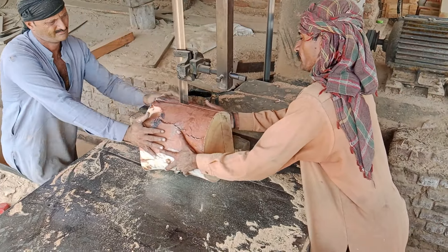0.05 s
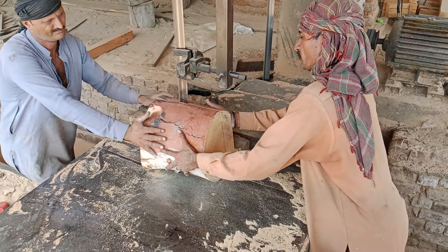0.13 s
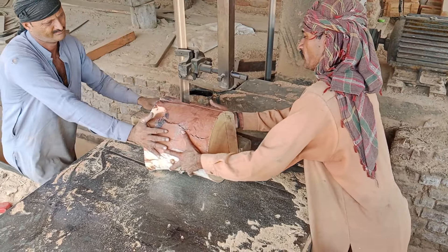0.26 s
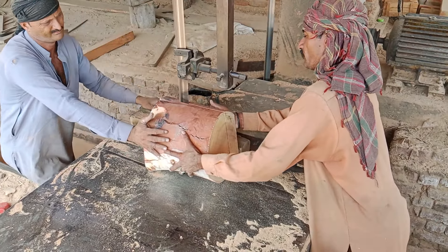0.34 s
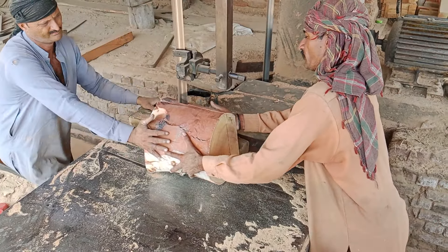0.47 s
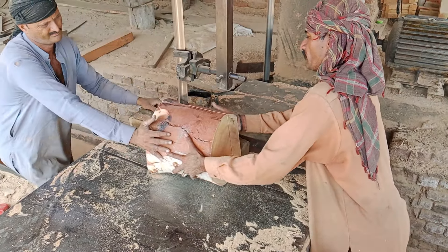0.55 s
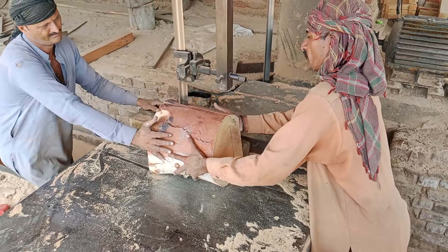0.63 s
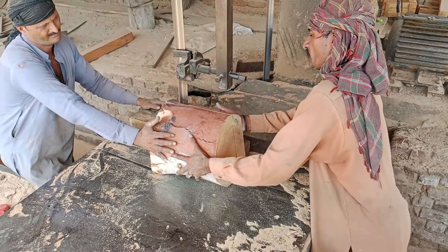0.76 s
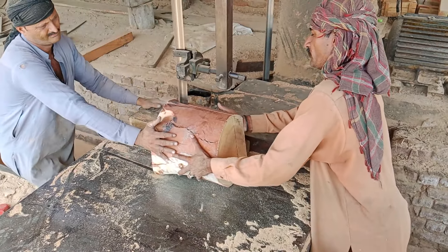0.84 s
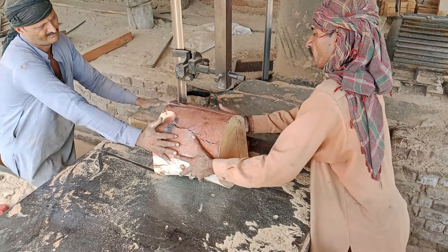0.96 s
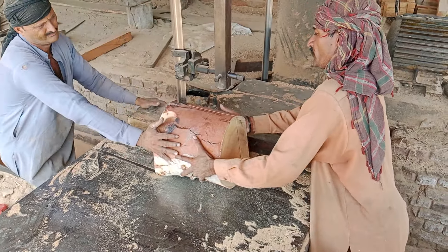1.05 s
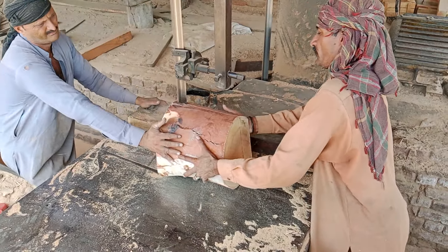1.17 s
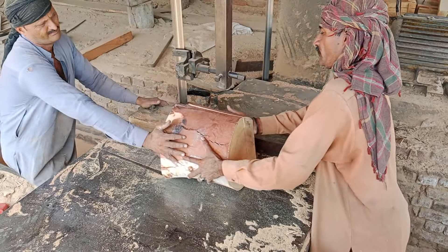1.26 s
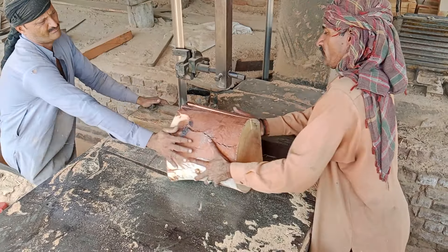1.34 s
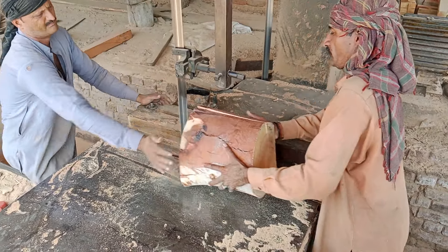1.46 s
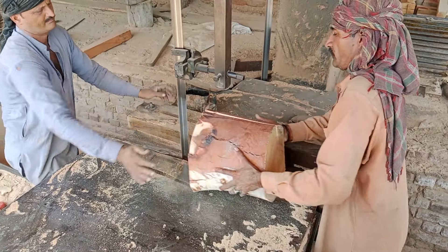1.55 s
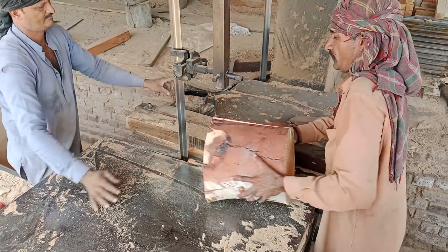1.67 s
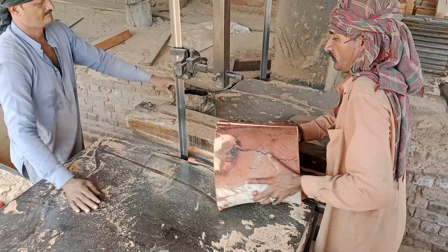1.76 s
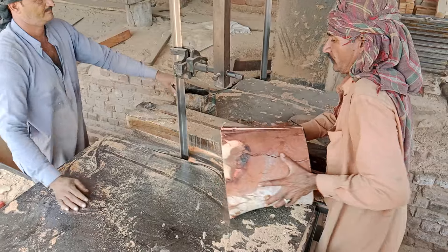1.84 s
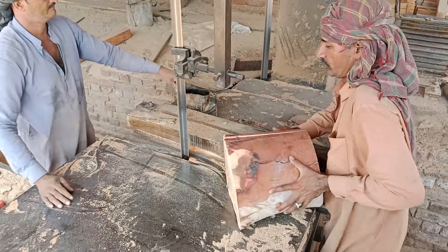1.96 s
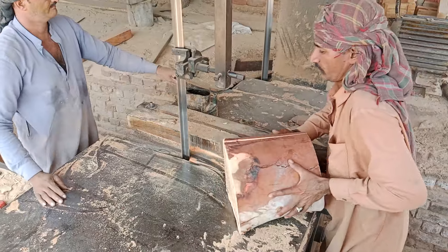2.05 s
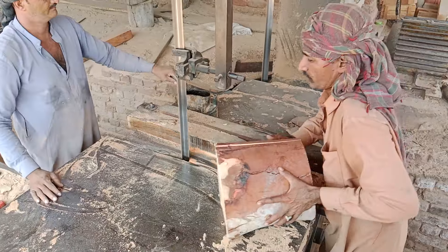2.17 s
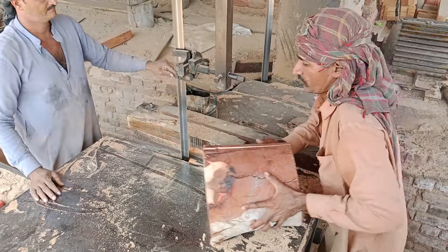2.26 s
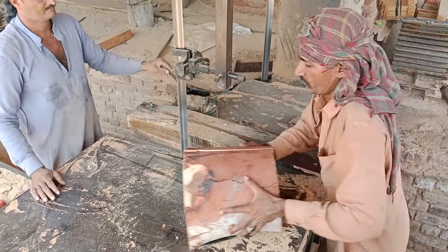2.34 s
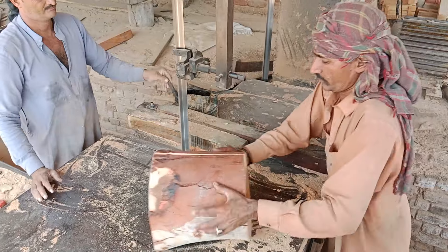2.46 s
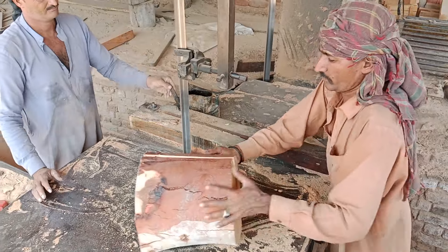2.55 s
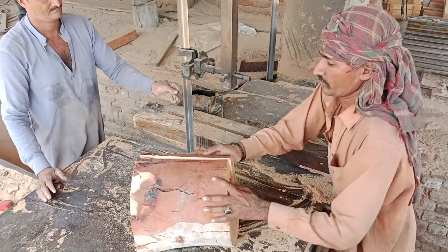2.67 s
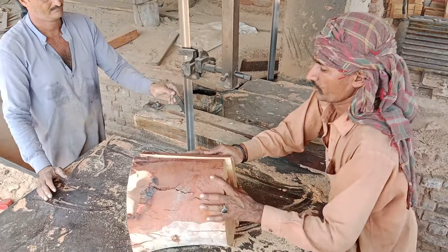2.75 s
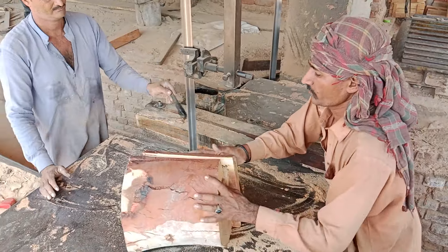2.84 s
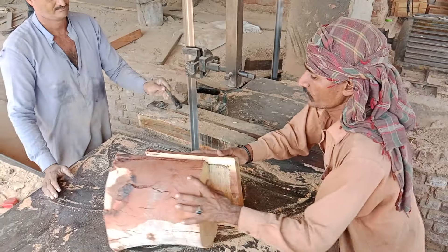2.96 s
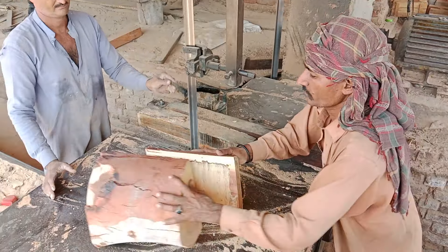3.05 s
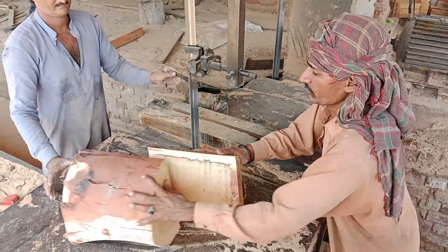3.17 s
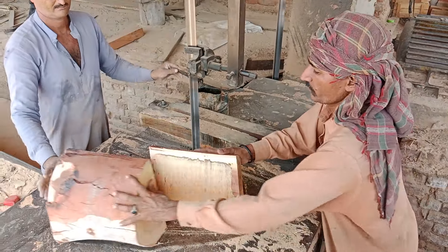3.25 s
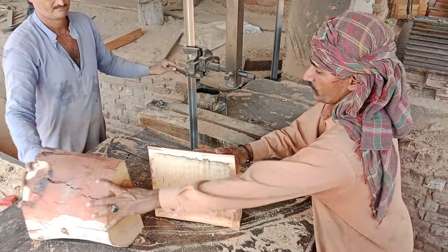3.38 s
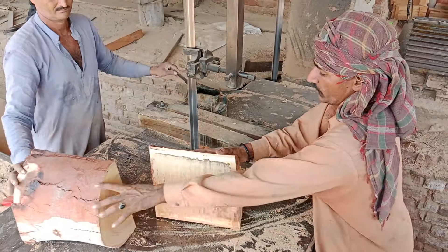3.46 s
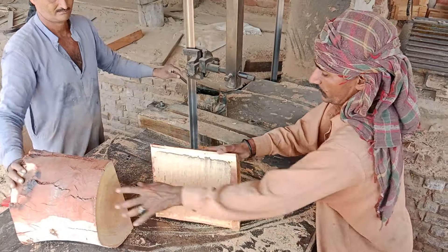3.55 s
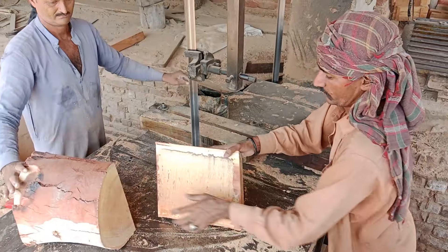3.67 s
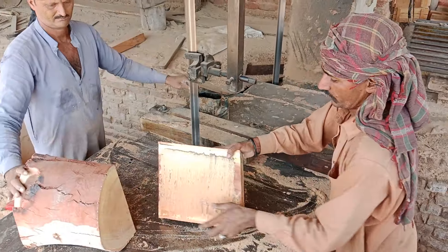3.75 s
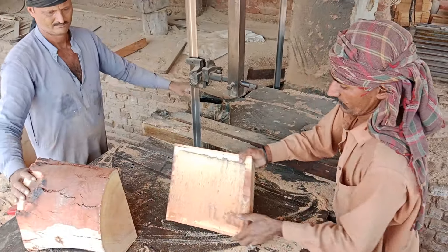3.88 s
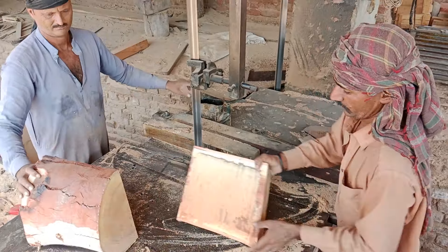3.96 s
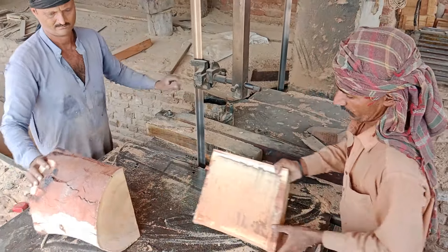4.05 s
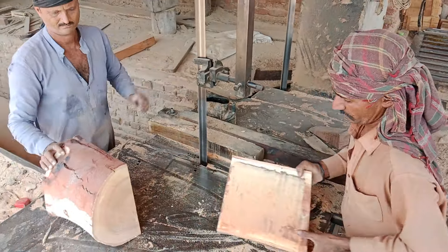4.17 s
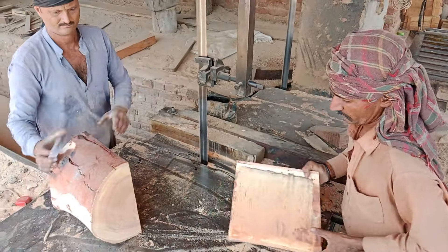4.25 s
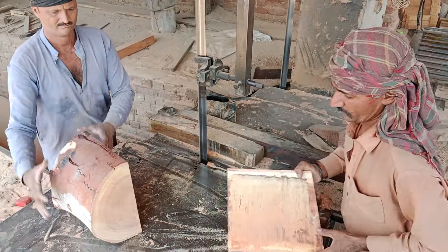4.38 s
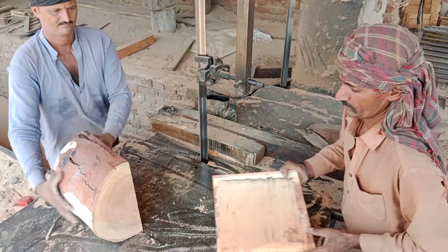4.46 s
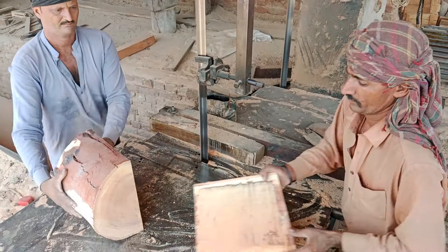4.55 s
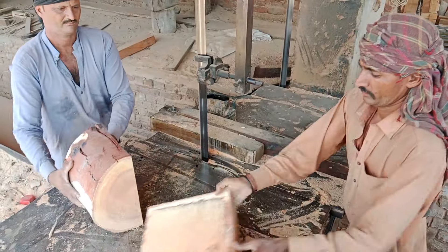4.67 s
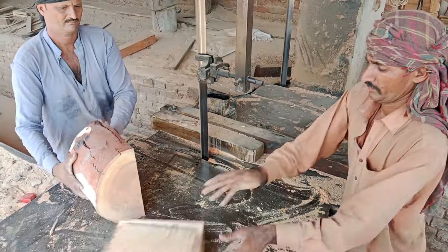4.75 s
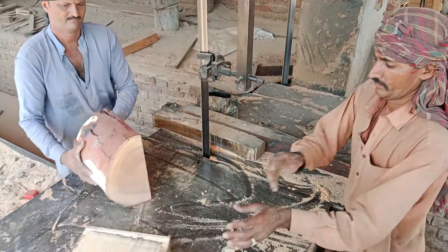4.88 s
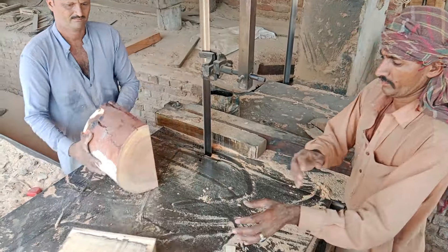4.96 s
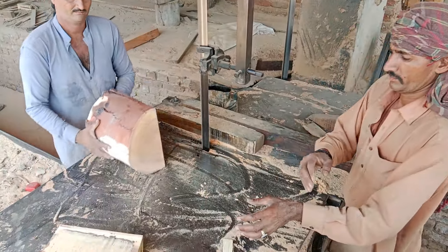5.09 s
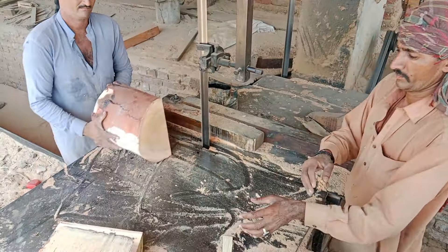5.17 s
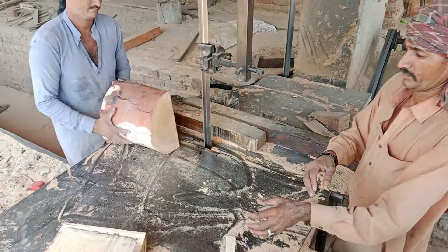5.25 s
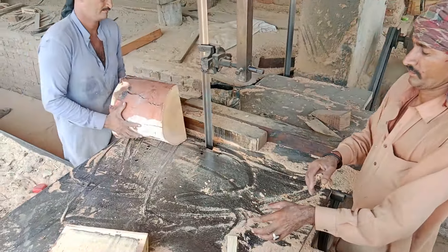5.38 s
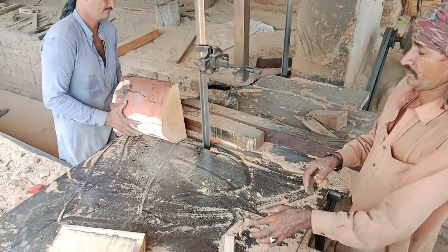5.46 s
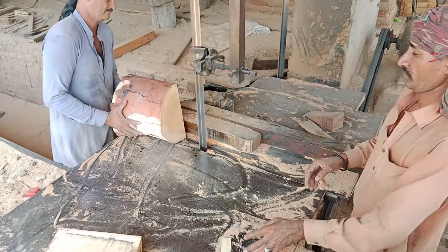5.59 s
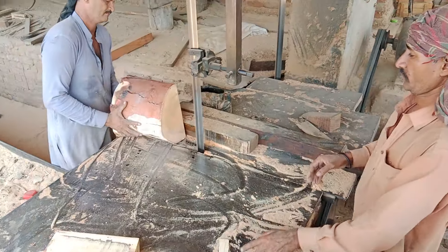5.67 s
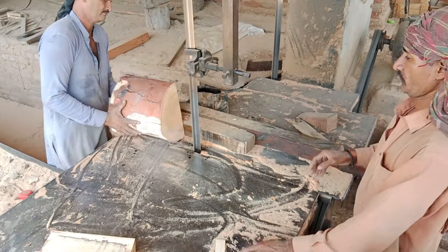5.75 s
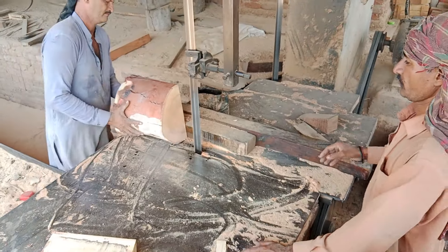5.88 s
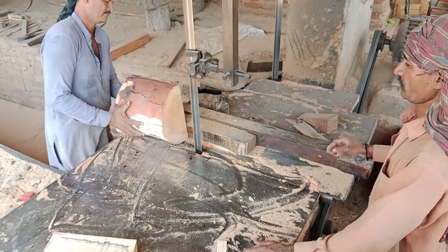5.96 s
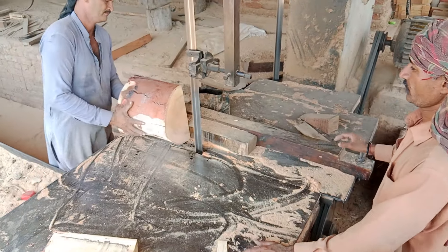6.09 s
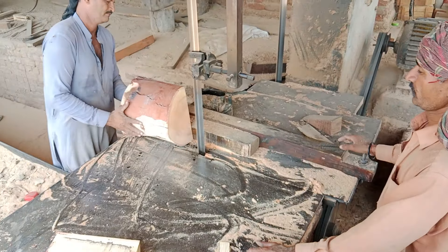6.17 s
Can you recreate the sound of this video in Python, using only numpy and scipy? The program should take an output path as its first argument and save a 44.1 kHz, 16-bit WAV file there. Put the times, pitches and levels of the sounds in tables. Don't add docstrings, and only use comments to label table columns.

```python
import sys
import numpy as np
from scipy import signal
from scipy.fft import rfft, irfft, next_fast_len
from scipy.io import wavfile
from scipy.ndimage import uniform_filter1d

SR = 44100
rng = np.random.default_rng(int(sys.argv[2]) if len(sys.argv) > 2 else 0)


def gain_from_db(level_db):
    decades = np.asarray(level_db, float) / 20
    return 10 ** decades


def store_wav(level_fs):
    pcm = np.round(np.clip(np.atleast_2d(level_fs), -1, 1) * 32767)
    wavfile.write(sys.argv[1], SR, pcm.T.astype(np.int16))


N = 274302
SECONDS = np.arange(N) / SR
CUT_ENDS_S = 1.318
WHEEL_HZ = 9.33


def unit(x):
    return x / np.sqrt(np.mean(x ** 2))


def curves(table):
    s, *columns = np.transpose(table)
    return [np.interp(SECONDS, s, c) for c in columns]


def ramp(start_s, end_s, db):
    return db * np.clip((SECONDS - start_s) / (end_s - start_s), 0, 1)


def swell(middle_s, length_s, height):
    return height * np.exp(-(2 * (SECONDS - middle_s) / length_s) ** 2)


def swells(table):
    return sum(swell(*row) for row in table)


def walk(rate_hz):
    k = int(SR / rate_hz)
    held = np.repeat(rng.standard_normal(N // k + 1), k)[:N]
    return unit(uniform_filter1d(uniform_filter1d(held, k), k))


def noise(quick_db, rate_hz):
    return rng.standard_normal(N) * gain_from_db(2 * quick_db * np.tanh(walk(rate_hz) / 2))


def colour(x, points, modes=(), order=1):
    size = next_fast_len(N)
    hz = np.arange(1, size // 2 + 2) * SR / size
    at, db = np.transpose(points)
    broad = gain_from_db(np.interp(np.log(hz), np.log(at), db, left=-120, right=-120))
    rings = sum(gain_from_db(d) * np.exp(1j * lean) / (1 + 2j * (hz - f) / w) ** order for f, w, d, lean in modes)
    return irfft(rfft(x, size) * broad * (1 + rings), size)[:N]


def narrow(hz, width_hz, steady=0.37):
    peak = signal.iirpeak(hz, hz / width_hz / 1.5, SR)
    ringing = signal.lfilter(*peak, signal.lfilter(*peak, noise(0.61, 12)))
    power = uniform_filter1d(ringing ** 2, SR // 16) + 1e-12
    return unit(ringing / power ** (steady / 2))


# time in seconds, tooth rate in Hz, bite level in dB.
CUT = [
    (0, 583.5, -25.5),
    (.2, 584, -22),
    (.4, 577.7, -19.5),
    (.6, 570, -21.5),
    (.8, 563.3, -20),
    (1.0, 555.7, -16),
    (1.2, 546.5, -27),
    (1.315, 546.4, -20),
    (1.34, 547, -63),
]
# Hz, width
# in Hz, dB, lean in rad.
CUT_MODES = [(548, 11, 14, 0), (636, 9.9, 15, 0), (760, 13, 7, 0), (999, 14, 14, 0), (1764, 21, 21, 0),
             (1100, 12, 8, 0), (2262, 48, 27.5, 0), (2748, 45, 30, 0), (3440, 57, 3, 0), (3960, 40, 16, 0),
             (4567, 120, 14, 0), (4670, 75, 16.5, 0), (5080, 35, 18, 0), (5770, 54, 2, 0),
             (6250, 170, 11, 0), (6970, 460, 8.5, 0), (7110, 105, 25.5, 0), (13700, 700, 13, 0),
             (14100, 80, -1, 0), (14950, 120, 4, 0), (15370, 80, 12, 0)]
# Hz, dB.
BITE_COLOUR = [(300, -43), (500, -10), (1150, -6.5), (1500, -3), (3000, -35), (6500, 9.5), (7400, -0.5),
               (8500, -9), (10500, -29), (12000, -34), (12800, -7), (15000, -10), (16000, -36)]


def teeth():
    set_db, scatter_db, slip_teeth, wander = 7, 1.5, .006, .0007
    chips_db, chip_decay_teeth = -7, 0.32
    tooth_hz, bite_db = curves(CUT)
    turns = np.cumsum(2 * tooth_hz * (1 + wander * walk(25))) / SR
    count = np.arange(1, int(turns[-1]))
    slips, scatter = rng.standard_normal((2, len(count)))
    when = np.clip(np.interp(count + slip_teeth * slips, turns, np.arange(N)), 8, N - 9)
    size = gain_from_db(set_db * (count % 2) + scatter_db * scatter)

    at = when.astype(int) + np.arange(-7, 9)[:, None]
    bites = np.zeros(N)
    np.add.at(bites, at, size * np.sinc(at - when) * np.cos((at - when) * np.pi / 16) ** 2)

    chips = noise(0.7, 27.5) * np.exp(-(turns % 1) / chip_decay_teeth)
    bites = unit(colour(bites, BITE_COLOUR, CUT_MODES, order=2))
    chips = unit(colour(chips, BITE_COLOUR, CUT_MODES))
    return gain_from_db(bite_db) * (bites + gain_from_db(chips_db) * chips)


def squeal():
    from_db, grows_db_per_s = -56, 9.5
    db = from_db + grows_db_per_s * np.minimum(SECONDS, CUT_ENDS_S)
    db = db + swell(1.24, 0.39, 10.5) + ramp(1.33, 1.47, -30)
    return gain_from_db(db) * narrow(2750, width_hz=22)


def tooth_phase():
    return 2 * np.pi * np.cumsum(curves(CUT)[0]) / SR


def parting_log():
    level = swell(1.125, .12, gain_from_db(-35))
    return np.sqrt(2) * level * np.sin(2 * tooth_phase() + .4 * walk(30.3))


# multiple of the roller rate, dB rms, beat in dB once a wheel turn.
ROLLER_PARTIALS = [(5, -45, 2), (6, -42, 2), (7, -43, 5), (9, -47, 3), (10, -48, 3)]


def roller():
    turns_per_tooth, beat_peak_s = .192, .26
    phase = turns_per_tooth * tooth_phase()
    beat = np.cos(2 * np.pi * WHEEL_HZ * (SECONDS - beat_peak_s))
    stack = 0
    for multiple, db, beat_db in ROLLER_PARTIALS:
        level = gain_from_db(db + beat_db * beat + 2.7 * walk(6.36))
        stack = stack + level * np.sin(multiple * phase + 1.14 * walk(12))
    return np.sqrt(2) * stack * gain_from_db(ramp(CUT_ENDS_S, CUT_ENDS_S + .2, -41))


def settle(db, settle_s):
    drops_s = 0.018
    since_s = np.maximum(SECONDS - CUT_ENDS_S, 0)
    return db * (1 - np.exp(-since_s / drops_s)) * np.exp(-since_s / settle_s)


# Hz, dB.
RUB_COLOUR = [(1000, -27), (1250, -15.5), (1450, -14), (1750, -8.5), (2250, -9), (3100, -14), (4000, -9.5),
              (5200, -2), (6200, 0.5), (7200, 0), (7800, -10.5), (9000, -21.5), (10500, -30.5),
              (12000, -27.5)]
# Hz, width in Hz, dB, lean in rad.
BLADE_MODES = [(2652, 83, 11, 1.62), (3410, 28, 2.5, 0), (4060, 45, -5, 0), (5430, 29, -17, 0.12),
               (6808, 95, 7, 0.38)]


def blade_rub(flutter, cutting, path_db):
    edges_hz = (900, 2000, 3400, 4800, 6400, 7800, 12500)
    treble_db = ramp(4.6, 7, 6.2) + swell(3.72, .25, -3)
    dip_db = settle(-12.5, 0.075)
    rub = 0
    for low, high in zip(edges_hz[:-1], edges_hz[1:]):
        band = signal.butter(2, (low, high), "bandpass", fs=SR, output="sos")
        part = signal.sosfilt(band, noise(0.79, 18)) * flutter ** (low / 13500)
        db = treble_db * (high == edges_hz[-1]) + dip_db * min(low / 5700, 1)
        rub = rub + part * gain_from_db(db)
    return gain_from_db(-21 + 1.2 * cutting + path_db) * unit(colour(rub, RUB_COLOUR, BLADE_MODES))


# Hz, dB.
HISS_COLOUR = [(8500, -20), (10000, -25), (12050, -17.5), (12500, -5), (13600, 3), (14300, 1.5),
               (15000, -1), (15800, -5)]


def guide_hiss(flutter, cutting, path_db):
    db = -36 + 9 * cutting + 0.64 * path_db + settle(-8, 0.24) + ramp(3.1, 3.3, -2.1)
    return gain_from_db(db) * unit(colour(noise(0.99, 16) * flutter, HISS_COLOUR))


# middle in seconds, length in seconds, height in dB.
SONG_SWELLS = [(1.77, 0.047, 7), (2.463, 0.064, 4.5), (3.196, .2, 3), (3.58, .2, 1.5), (3.38, .08, 0),
               (3.706, 0.045, -2), (4.2, 1, -1), (5.403, 0.45, 5), (5.56, .06, -5)]


def blade_song(cutting, path_db):
    lap_hz, lap_peak_s, lap_db = 2.88, 2.168, 1
    lap = np.cos(2 * np.pi * lap_hz * (SECONDS - lap_peak_s))
    db = -36 - 3.5 * cutting + 0.53 * path_db + lap_db * lap + swells(SONG_SWELLS)
    return gain_from_db(db) * narrow(2559, width_hz=40)


# Hz, dB.
DRONE_COLOUR = [(330, -9.5), (420, -7), (500, -0.5), (700, 3), (1050, 3.5), (1200, -5.5), (1500, -22)]
# Hz, width in Hz, dB, lean in rad.
PANEL_MODES = [(533, 18, 0.84, 0), (638, 18, 1.5, 0), (752, 23, 1.3, 0), (857, 24, 3.3, 0),
               (895, 9.8, 8.6, 0), (1069.4, 12, 2.4, 0)]
# middle in seconds, length in seconds, height in dB.
DRONE_SWELLS = [(3.3, .6, 0.63)]


def frame_drone(cutting, path_db):
    db = -35.5 + 1.5 * cutting + 0.1 * path_db + ramp(4.6, 6.6, -2) + swells(DRONE_SWELLS)
    return gain_from_db(db) * unit(colour(noise(.5, 14), DRONE_COLOUR, PANEL_MODES))


# middle in seconds, length in seconds, height in dB.
HUM_SWELLS = [(1.2, 0.27, 2.5), (2.3, 0.27, 2.8), (3.3, 0.92, 12), (5.7, 0.55, 3)]


def hum(cutting):
    return gain_from_db(-53 + cutting + swells(HUM_SWELLS)) * narrow(582.4, width_hz=9.5)


# Hz, dB.
RUMBLE_COLOUR = [(15, -68), (25, -18), (91, -4.5), (110, -9.5), (166, 1.5), (229, 0), (267, 1), (306, -2.5),
                 (348, -16.5), (400, -27.5), (520, -64), (880, -120)]
# Hz, width in Hz, dB, lean in rad.
CASING_MODES = [(127.6, 26, 7, 0), (170.5, 23, 2.5, 0), (220, 14.6, 4, 0), (316.3, 22.4, 7.5, 0)]
# middle in seconds, length in seconds, level in dB.
SHOVES = [(.12, .08, -45), (0.278, 0.18, -41.5), (0.713, 0.12, -48.5), (0.88, 0.12, -43),
          (1.12, 0.2, -45.5), (1.355, 0.27, -40.5), (1.596, 0.26, -41.5), (1.86, 0.11, -43),
          (2.12, .16, -47), (2.268, .1, -49), (2.41, 0.068, -43.5), (2.57, 0.24, -54), (2.904, .18, -40),
          (3.2, 0.17, -44), (3.347, 0.14, -37), (3.54, 0.076, -39.5), (3.74, 0.13, -39),
          (4.064, .22, -39.5), (4.25, 0.14, -44.5), (4.41, .14, -44), (4.685, 0.23, -40),
          (5.12, .25, -45.5), (5.42, 0.3, -42.5), (5.7, .22, -44), (5.925, 0.11, -44), (6.083, 0.11, -43.5),
          (6.2, .06, -44)]


def rumble():
    wheels_db = -56
    shoved = sum(swell(s, length_s, gain_from_db(db - wheels_db) ** 2) for s, length_s, db in SHOVES)
    level = gain_from_db(wheels_db + 10 * np.log10(1 + shoved))
    return level * unit(colour(noise(3.2, 30), RUMBLE_COLOUR, CASING_MODES))


# time in seconds, open path in dB.
PATH = [(0, -2), (.45, -1), (.9, -0.5), (1.3, 1), (1.6, 0), (2.2, 1), (2.75, .3), (3.15, -0.5), (3.65, .5),
        (3.75, 0), (4.4, -0.5), (5.0, 0.4), (5.5, 0.34), (6.15, 0.5), (6.22, -2)]


def machine():
    lets_go_s = .012
    cutting = 1 - ramp(CUT_ENDS_S - lets_go_s, CUT_ENDS_S + lets_go_s, 0.91)
    path_db, = curves(PATH)
    wheel = np.sin(2 * np.pi * np.cumsum(WHEEL_HZ + 0.5 * walk(2.77)) / SR)
    flutter = gain_from_db(0.49 * wheel + 1.27 * walk(80))
    blade = blade_rub(flutter, cutting, path_db) + blade_song(cutting, path_db)
    guides = guide_hiss(flutter, cutting, path_db)
    return blade + guides + frame_drone(cutting, path_db) + hum(cutting) + rumble()


def ring(modes, contact_ms, rise_s):
    t = np.arange(SR // 3) / SR
    y = sum(gain_from_db(db) * np.sin(2 * np.pi * hz * t) * 1000 ** (-t / t60_s) for hz, db, t60_s in modes)
    push = np.hanning(int(contact_ms * SR / 1000) + 3)
    return np.convolve(y * (1 - np.exp(-(t / rise_s) ** 2)), push / push.sum())[:len(t)]


# time in seconds, table thump in dB, wood knock in dB, contact in ms.
BUMPS = [
    (1.258, -19.5, -41, 1.6),
    (1.303, -25, -17.5, 1.7),
    (4.8, -2, -47, 3.7),
    (4.8562, -5, 0, .3),
    (4.8675, 5, -30, 2),
    (4.919, -10.5, -38, 1.5),
    (4.959, -4.5, -35, 1.9),
    (4.995, -18, -50, 2),
    (5.024, -20, -50, 2.6),
    (5.824, -42, -24, .6),
]
# Hz, dB, t60 in seconds.
TABLE_MODES = [(101, -24, .05), (142.2, -15.5, 0.18), (175.4, 6.5, 0.035), (233, 8, 0.018),
               (311, -10.5, 0.071)]
# Hz, dB, t60 in seconds.
WOOD_MODES = [(413, 0.5, 0.019), (518, -5, 0.043), (646, -3.5, 0.067), (740, -1.5, 0.062),
              (821, -5.5, 0.083), (877, -3, 0.034), (1075, -9, 0.065), (1240, -19, .04), (1700, -27, 0.027),
              (2350, -14, .02)]


def bumps():
    out = np.zeros(N + SR)
    t = np.arange(SR // 3) / SR
    crack = rng.standard_normal(len(t)) * np.exp(-t / 0.0046)
    crack = signal.lfilter(*signal.iirpeak(2300, 1.2, SR), crack)
    rattle = rng.standard_normal(len(t)) * (t > .008) * np.exp(-t / 0.034)
    rattle = signal.lfilter(*signal.iirpeak(5500, 4, SR), rattle)
    for s, thump_db, knock_db, contact_ms in BUMPS:
        thump = ring(TABLE_MODES, contact_ms, rise_s=0.0052)
        knock = ring(WOOD_MODES, contact_ms, rise_s=0.00062) + gain_from_db(-6) * crack + gain_from_db(-11) * rattle
        start = int(s * SR)
        out[start:start + len(t)] += gain_from_db(thump_db) * thump + gain_from_db(knock_db) * knock
    return out[:N]


def shop(x, wet_db):
    t60_s, first_echo_s = 0.27, .004
    t = np.arange(SR // 2) / SR
    tail = rng.standard_normal(len(t)) * 1000 ** (-t / t60_s) * (t > first_echo_s)
    return x + gain_from_db(wet_db) * signal.fftconvolve(x, tail / np.sqrt(np.sum(tail ** 2)))[:N]


def scene():
    cut = shop(teeth(), wet_db=-7) + squeal() + parting_log() + roller()
    return np.tile(cut + machine() + shop(bumps(), wet_db=-13.5), (2, 1))


def roll_off(x):
    return signal.sosfilt(signal.butter(12, 15720, fs=SR, output="sos"), x)


def record(dry):
    ceiling, knee, top_hz = 0.46, 5, 15720
    dry = signal.sosfilt(signal.butter(2, 110, "highpass", fs=SR, output="sos"), dry)
    flat = dry / (1 + np.abs(dry / ceiling) ** knee) ** (1 / knee)
    mix = signal.sosfilt(signal.ellip(12, .2, 70, top_hz, fs=SR, output="sos"), flat)
    return roll_off(mix)


dry = scene()
out = record(dry)
store_wav(out)
```